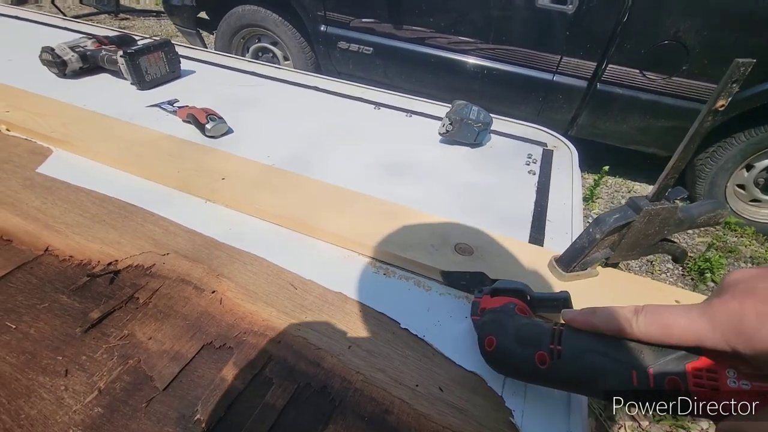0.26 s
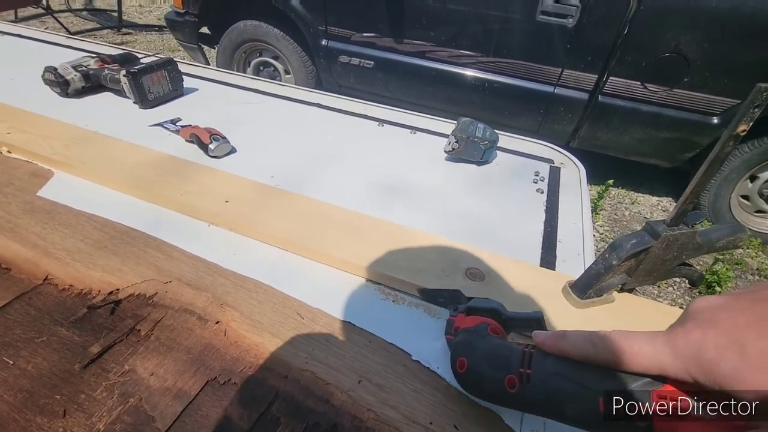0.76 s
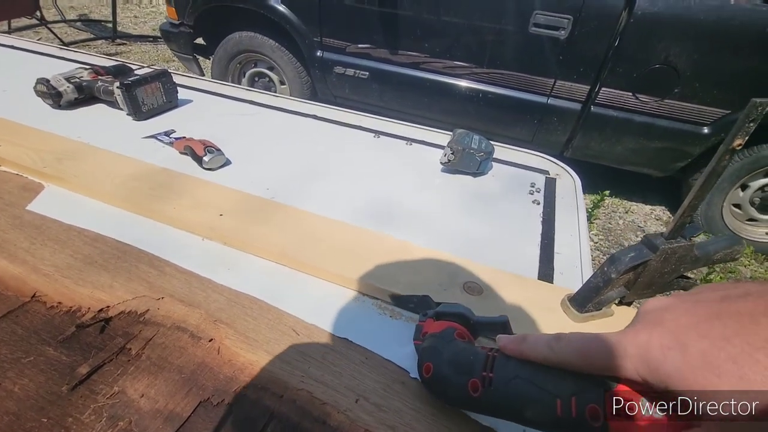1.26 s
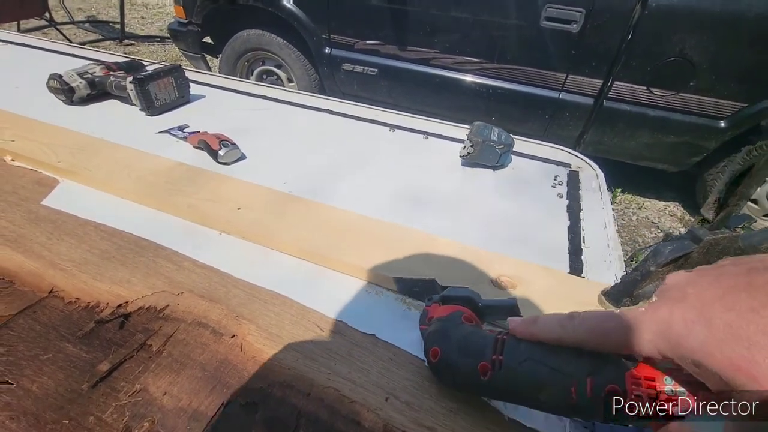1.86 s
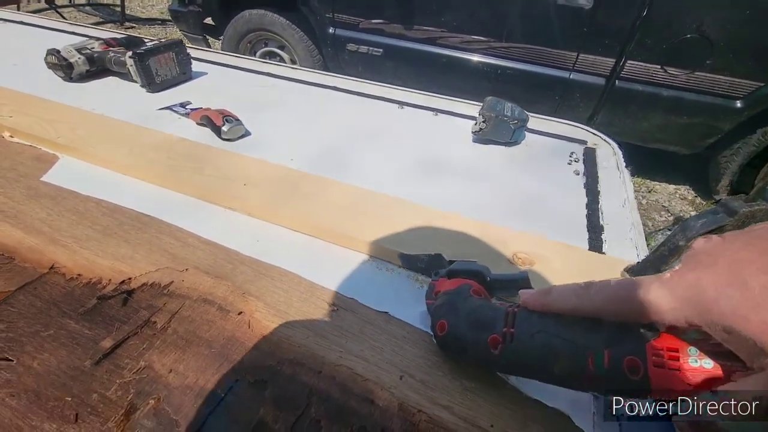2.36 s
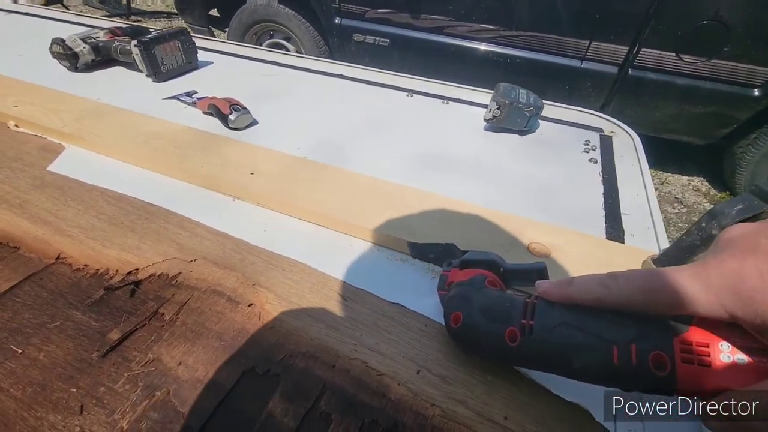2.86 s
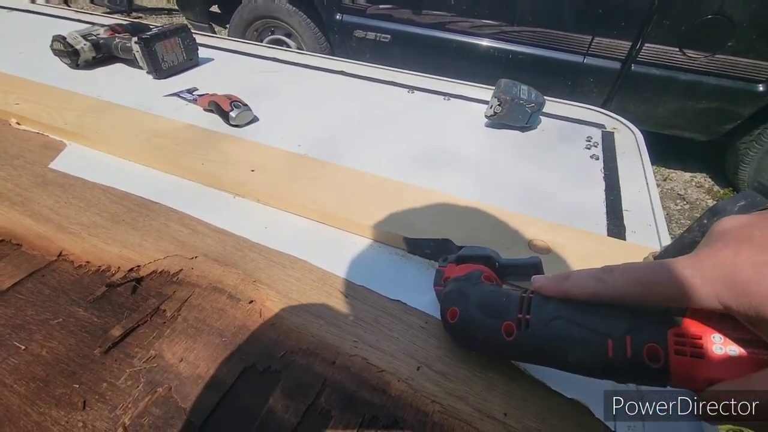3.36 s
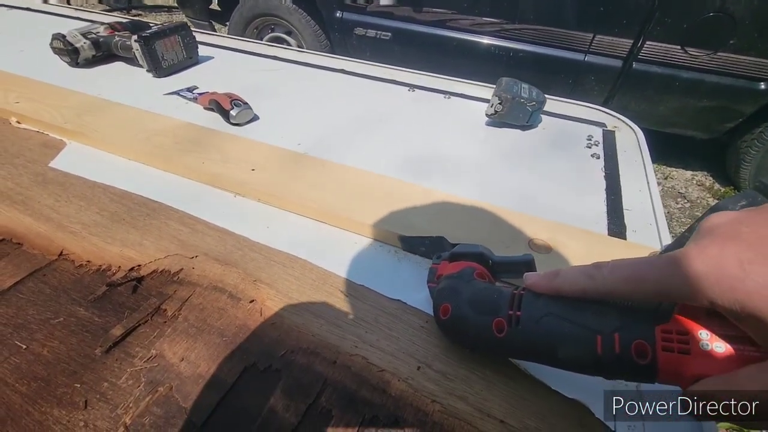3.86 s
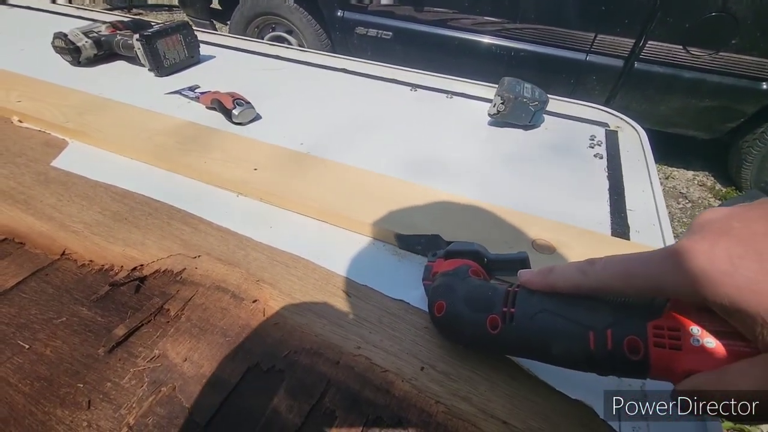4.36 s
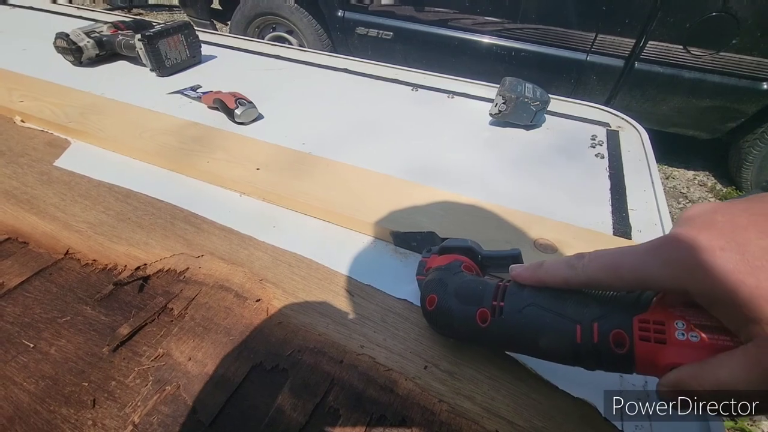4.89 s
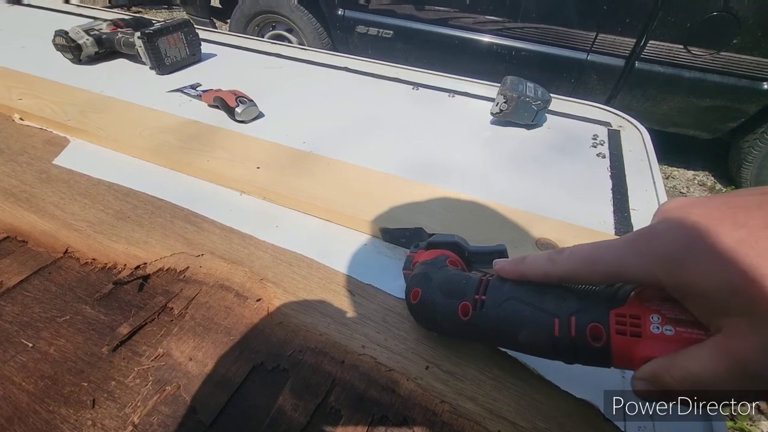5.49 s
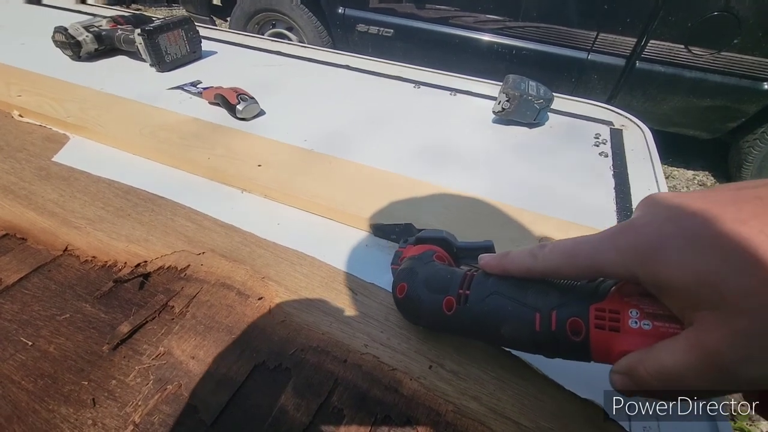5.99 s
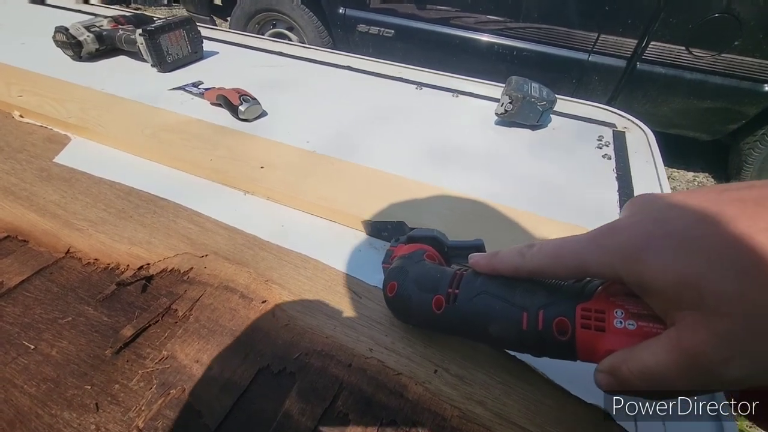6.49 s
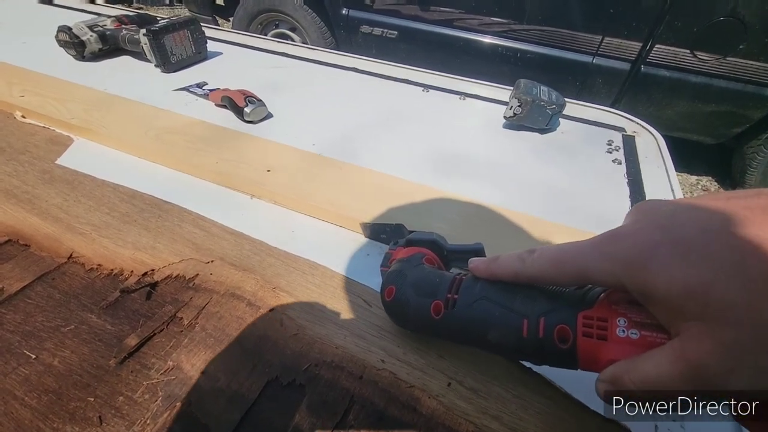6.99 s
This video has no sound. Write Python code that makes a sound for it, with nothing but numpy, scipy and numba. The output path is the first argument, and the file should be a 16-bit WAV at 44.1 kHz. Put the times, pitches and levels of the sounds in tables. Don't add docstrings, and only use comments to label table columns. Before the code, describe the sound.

Outdoors, very close to a stereo microphone, a cordless oscillating saw is already running and never stops. Its dense, nasal buzz holds nearly one low pitch while a bright metallic ring and pulsing tooth fizz come forward as the blade enters the wood within the first second. The tone changes as the grip shifts; dull knocks fall around the middle, over low, uneven wind buffeting.

```python
import sys
import numpy as np
from scipy import signal
from scipy.fft import rfft, irfft, next_fast_len
from scipy.io import wavfile
from scipy.ndimage import uniform_filter1d
from numba import njit

SR = 44100
rng = np.random.default_rng(int(sys.argv[2]) if len(sys.argv) > 2 else 0)


def log_audio(samples):
    frames = np.atleast_2d(samples).T
    limited = np.clip(frames, -1, 1)
    pcm = np.round(limited * 32767).astype(np.int16)
    wavfile.write(sys.argv[1], SR, pcm)


def volts_from_decibels(level):
    exponent = np.asarray(level, float) / 20
    return 10 ** exponent


N = 319284
ORDERS_N, HOP = 63, 64

# time_s, stroke_hz
STROKE_RATE = [(0.0, 239.3), (0.08, 242.6), (1.03, 252.4), (1.81, 251.6), (1.85, 253.2), (2.34, 253.3),
               (2.76, 251.3), (2.86, 251.5), (3.41, 249.2), (3.53, 250.4), (3.69, 251), (4.78, 248.7),
               (4.86, 246.5), (5.75, 243.7), (6.61, 248.3), (7.24, 244)]
# pitch_hz, level_db
STEEL = [(2250, 1.5), (2500, 1.5), (2750, -15.5), (3000, -5.5), (3250, -4.5), (3500, -10.5), (3750, -8.5),
         (4850, -11.5), (5600, -15.5), (7000, -15), (8260, -21), (9120, -18.5), (10300, -22.5),
         (14900, -18.5)]
# order, level_db
FIZZ = [(1, -24), (2, -16), (3, -24.5), (5, -9), (6, -41), (7, -12.5), (9, -9.5), (13, -8.5), (20, -5.5),
        (28, -1.5), (40, 1.5), (52, 20.5), (62, -10)]
# order, level_db
FLUTTER = [(1, -22), (3, -18.5), (6, -13), (9, -11.5), (13, -8), (20, -7.5), (62, -2)]
ALIKE = [(1, 0.01), (3, 0.95), (4, 0.26), (5, 0.94), (6, 0.9), (7, 0.44), (8, 0.55), (9, 0.84), (13, 0.78),
         (20, 0.51), (24, 0.26), (62, 0)]
HOLDS = [-0.002, 2.501, 2.7, 4.8, 4.9, 6.3, 6.5, 7.239]
# order, left_lead_rad, left_minus_right_db
FIRST_GRIP = [(2, -2.78, -3.3), (3, -2.2, -2.9), (4, -2.81, -9.7), (5, -2.2, -2.2), (6, -3.18, 0.1),
              (7, -3.6, 6.5), (8, -2.5, 4.0), (9, -3.67, 0.6), (10, -3.76, 1.7), (11, -4.02, -0.6),
              (12, -7.26, -2.7), (13, -7.49, -0.1), (14, -7.88, 0.8)]
SECOND_GRIP = [(2, -2.53, -8.7), (3, -2.4, -4.2), (4, -2.33, -3.8), (5, -3.12, -0.1), (6, -2.55, 4.8),
               (7, -5.0, 7.5), (8, -2.76, 1.9), (9, -3.78, -2.6), (10, -4.21, -1.1), (11, -6.47, -1.4),
               (12, -6.63, -1.2), (13, -7.9, 4.0), (14, -8.39, 3.8)]
THIRD_GRIP = [(2, -1.68, -10.0), (3, -2.08, -2.7), (4, -2.79, -8.6), (5, -2.63, -3.8), (6, -2.98, -1.0),
              (7, -3.11, 3.1), (8, -1.45, 3.3), (9, -3.21, -2.8), (10, -3.63, -4.7), (11, -6.06, 0.6),
              (12, -6.75, 0.8), (13, -7.4, 3.0), (14, -8.0, 2.0)]
FOURTH_GRIP = [(2, -1.84, -7.8), (3, -0.93, -1.1), (4, -2.41, -6.0), (5, -2.72, -3.4), (6, -2.47, -3.6),
               (7, -0.91, 5.6), (8, -2.3, 3.2), (9, -3.46, -0.5), (10, -4.96, -4.1), (11, -5.94, 2.0),
               (12, -6.83, 1.9), (13, -6.98, 2.8), (14, -8.1, 2.4)]
# order, left_minus_right_db
SHADE = [(15, 4.5), (19, 6.5), (23, -0.5), (33, -3), (60, 2.5)]
BEHIND = [(14, 0), (15, -1), (20, -1.9), (24, -4.6), (63, -25)]
OPPOSED = [5, 6, 8, 15, 16]
# time_s, hum_db, left_minus_right_db, left_lead_rad
LEAN = [(0, -27.5, -6.5, -.6), (1, -29.6, -7, -.9), (2.1, -33, -5.2, -1.05), (2.9, -31, -4.8, -1.2),
        (3.3, -27.4, -1.5, -1.9), (4.5, -26.2, 3.2, -1.35), (5, -22.4, 4.8, -1.1), (5.8, -20.4, 3.5, -.7),
        (6.4, -21.8, 2.3, -.6), (6.9, -20.4, .5, -.45), (7.24, -20.1, -.1, -.4)]
# time_s, steel_ring_db, firmness_of_seat_db
BITE = [(0, -31, 6.5), (.45, -31, -2), (.84, -19, 2.5), (1.1, -24, -1.5), (1.55, -19.5, -4.5),
        (2, -25, 5.5), (2.35, -23, 10), (2.66, -20.5, 9.5), (3.1, -19.5, 1), (3.36, -20.5, 4),
        (3.64, -17.5, -2), (3.8, -18.5, 2), (4.2, -20.5, 4.5), (4.76, -19, -2), (5.3, -16, 3.5),
        (5.9, -19, -5), (6.3, -17, -7), (7.24, -20.5, 1.5)]
# order, first_db, second_db, third_db, fourth_db
PANEL = [(2, -36, -24.3, -31.8, -25.2), (3, -25.5, -27.5, -30.2, -39), (4, -28, -34.3, -36.3, -30.8),
         (5, -29, -25.2, -24.3, -27.8), (6, -28.3, -33.5, -30.3, -34.8), (7, -29.5, -33.5, -28, -31.3),
         (8, -27, -29.7, -31.8, -32.2)]
# order, change_before_entry_db, share_of_seat, second_grip_arrives_s
PANEL_ANSWERS = [(2, 1, 0, 3.35), (3, -1.5, .35, 3.4), (4, -3.5, -.4, 2.8), (5, 1.5, 0, 3.2),
                 (6, 0, 0, 2.75), (7, 3, .45, 3.4), (8, -4, .2, 3.5)]
# order, first_db, second_db, third_db, fourth_db
BLADE = [(9, -27, -32.5, -32, -34.5), (10, -23.5, -24, -28.5, -26.5), (15, -20.5, -20.5, -17.5, -19),
         (33, -22.5, -23, -20, -23)]
# order, change_before_entry_db, share_of_seat, second_grip_arrives_s
BLADE_ANSWERS = [(9, -2.5, 0.93, 3.3), (10, -4, 0.43, 3.2), (15, 1.5, 0.15, 2.6), (33, -2.5, .01, 2.8)]
# order, first_db, second_db, third_db, fourth_db
TINT = [(10.1, -0.5, -0.5, 5.5, -1), (11, 13, 1.5, -0.5, 7), (11.9, 0, 2.5, -2.5, -2),
        (13, 3, 3.3, 0.6, 1.4), (14, 0, 3.5, 3.5, 1.5), (14.6, -1, -2, -5, -2.5), (18.4, 2.5, -1, 0, 2),
        (20.1, 5, 5, 4, 2), (23.8, 2, 1, -2.5, 0), (33, 2, 2, 1, -0.5), (35, 6, 1.5, 1, 1.5),
        (38.6, 2, 1.5, 0, -1)]
# start_s, peak_db, pitch_hz, decay_to_60_db_down_s
KNOCKS = [
    (3.417, -19, 228, 0.059),
    (3.78, -29, 200.5, 0.063),
    (3.9, -36, 149.8, 0.072),
    (4.797, -39, 457, .06),
    (4.809, -15, 246, 0.068),
    (5.23, -37, 215.5, 0.072),
    (6.448, -24, 198.4, 0.062),
]
# peak_s, peak_db, rise_s, fall_s
GUSTS = [
    (.5, -30.5, 0.36, 0.28),
    (1.85, -45, 0.76, 0.9),
    (2.4, -45, 0.15, 0.35),
    (2.95, -39.5, 0.2, .9),
    (3.8, -34.5, 0.17, 0.4),
    (5.25, -30, 0.67, 0.28),
    (5.6, -32, 0.21, 0.38),
    (6.3, -39.5, 0.43, 1.5),
    (7.1, -42, 0.47, .5),
]
# pitch_hz, level_db_per_hz
RUMBLE = [(15, -41), (25, -2), (70, 7), (94, 4), (156, -7.5), (190, -3.5), (250, -23), (420, -120)]


def tool():
    order = np.arange(1, ORDERS_N + 1)
    t = np.arange(N // HOP + 2) * HOP / SR
    now = np.arange(N) / SR
    jitter_rad = 0.024 * np.interp(now, t, drift((len(t),), hz=30).real)
    turn = np.exp(2j * np.pi * np.cumsum(curves(STROKE_RATE, now)[0]) / SR + 1j * jitter_rad)
    line_db, at_ports = levels(order, t), ports(order, t)
    patches = uniform_filter1d(drift(line_db.shape, hz=1.4).real, size=3, axis=0)
    line_db[14:] += 4 * patches[14:]

    def play(gain, path):
        by_knot = (gain * path).transpose(0, 2, 1)
        return np.sqrt(2) * stack(turn, np.ascontiguousarray(by_knot), HOP)

    chatter_db = chatter(t) * np.clip(order / 9, 0, 1)[:, None]
    fizz = volts_from_decibels(along(FIZZ, order)[:, None] + chatter_db)
    lines = play(volts_from_decibels(line_db) * fluttering(order, t, fizz), at_ports)

    fizz_db = 0.5 * line_db + 0.5 * line_db.mean(axis=1, keepdims=True)
    dust = fizz / np.sqrt(1 + fizz ** 2) * heard(order, len(t), hz=177, order_of_fall=8)
    opposite = np.reshape([-1j, 1j], (2, 1, 1))
    from_cut = np.where(np.isin(order, OPPOSED)[:, None], opposite, at_ports)
    hiss = play(volts_from_decibels(fizz_db + 2.0) * dust, from_cut)

    gate = 0.28 * turn.real + 0.33 * (turn ** 2).real
    pulsed_hz = 2300
    pulses = irfft(rfft(gate * hiss) * (np.fft.rfftfreq(N, 1 / SR) > pulsed_hz), N)
    return lines + hiss + pulses


def fluttering(order, t, fizz):
    flutter = volts_from_decibels(along(FLUTTER, order))[:, None]
    sway = 1.1 * heard(order, len(t), hz=11) + 1.4 * heard(order, len(t), hz=32)
    start_rad = rng.uniform(0, 2 * np.pi, (ORDERS_N, 1))
    wander_rad = 0.81 * drift((ORDERS_N, len(t)), hz=2.34).real
    shape = np.exp(1j * (start_rad + wander_rad))
    return shape * (1 + flutter * sway) / np.sqrt((1 + flutter ** 2) * (1 + fizz ** 2))


def levels(order, t):
    ring_db, seat_db = curves(BITE, t)
    outside = np.interp(t, (0.55, 0.9), [1, 0])
    settle_s = 0.41
    parts = []
    for row, answer in zip(PANEL + BLADE, PANEL_ANSWERS + BLADE_ANSWERS):
        _, early_db, share, s = answer
        grip_db = held(row[1:], [0, s - settle_s, s, *HOLDS[3:]], t)
        parts.append(grip_db + early_db * outside + share * seat_db)
    parts = np.array(parts)
    tremor = drift((2, len(t)), hz=4.7).real
    ring_db = ring_db + 1.07 * tremor[0]
    teeth_and_tips_db = parts[9:] + 0.95 * tremor[1]
    blade_db = np.array([*parts[7:9], ring_db, *teeth_and_tips_db])
    band = np.searchsorted([10, 11, 15, 33], order[8:], side="right")
    steel_db = along(STEEL, 249 * order[8:])[:, None]
    hum_db = curves(LEAN, t)[:1]
    return np.vstack([hum_db, parts[:7], blade_db[band] + tint(order[8:], t) + steel_db])


def tint(order, t):
    return np.array([held(row, HOLDS, t) for row in curves(TINT, order).T])


def chatter(t):
    rattle_db = held((-1.4, -2, 1.1, 0), HOLDS, t)
    firm_db, quieted = 3.5, 1.07
    return rattle_db - quieted * np.clip(curves(BITE, t)[1] - firm_db, 0, None)


def ports(order, t):
    grips = np.repeat(np.array([FIRST_GRIP, SECOND_GRIP, THIRD_GRIP, FOURTH_GRIP]), 2, axis=0)
    lead, pan_db = (np.array([np.interp(t, HOLDS, row) for row in grips[:, :, c].T]) for c in (1, 2))
    high = order[14:, None]
    lean = curves(LEAN, t)
    lead = np.vstack([lean[2:], lead, lead[-1] + curves(BEHIND, high)[0]])
    pan_db = np.vstack([lean[1:2], pan_db, along(SHADE, high) + 0 * t])
    loose = np.sqrt(1 - np.clip(along(ALIKE, order), 0, 1))[:, None]
    loose = loose * np.clip((order - 1) / 11, 0, 1)[:, None] ** 2
    lead = lead + 1.5 * loose * drift(lead.shape, hz=1.49).real
    half = volts_from_decibels(pan_db / 2) * np.exp(0.5j * lead)
    return np.array([half, 1 / half]) * np.sqrt(2 / (volts_from_decibels(pan_db) + volts_from_decibels(-pan_db)))


def heard(order, size, hz, order_of_fall=4):
    alike = np.clip(along(ALIKE, order), 0, 1)[:, None]
    shared = drift((ORDERS_N, size), hz, order_of_fall)
    separate = drift((2, ORDERS_N, size), hz, order_of_fall)
    return np.sqrt(alike) * shared + np.sqrt(1 - alike) * separate


@njit
def stack(turn, gains, hop):
    out = np.zeros((gains.shape[0], len(turn)))
    for i in range(len(turn)):
        j, u, z = i // hop, (i % hop) / hop, turn[i]
        for k in range(gains.shape[2]):
            for c in range(gains.shape[0]):
                out[c, i] += (z * (gains[c, j, k] * (1 - u) + gains[c, j + 1, k] * u)).real
            z *= turn[i]
    return out


def knocks():
    out, t = np.zeros(N + SR), np.arange(SR // 4) / SR
    for s, db, hz, t60 in KNOCKS:
        bump = volts_from_decibels(db - 60 * t / t60) * np.sin(2 * np.pi * hz * t) * (1 - np.exp(-t / 0.0014))
        out[round(s * SR):][:len(t)] += bump
    return out[:N] * volts_from_decibels(np.array([[1.5], [-1.5]]))


def wind():
    m = next_fast_len(N)
    colour = volts_from_decibels(along(RUMBLE, np.fft.rfftfreq(m, 1 / SR)))
    rush = irfft(rfft(rng.standard_normal((2, m))) * colour, m)[:, :N]
    lumps = drift((2, N // HOP + 2), hz=19.0).real
    rush *= volts_from_decibels(5.0 * np.repeat(lumps, HOP, axis=1)[:, :N])
    return volts_from_decibels(gusts(np.arange(N) / SR) + 3.5) * rush / rush.std()


def gusts(t):
    calm_db, fade_db = -50.5, 17
    power = volts_from_decibels(calm_db) ** 2
    for s, db, rise, fall in GUSTS:
        away = np.where(t < s, (s - t) / rise, (t - s) / fall)
        power = power + volts_from_decibels(db - fade_db * away) ** 2
    return 10 * np.log10(power)


def along(points, x):
    at, v = np.transpose(points)
    return np.interp(np.log(x + 1), np.log(at + 1), v)


def curves(rows, t):
    s, *cols = np.transpose(rows)
    return np.array([np.interp(t, s, c) for c in cols])


def held(per_grip, moments, t):
    return np.interp(t, moments, np.repeat(per_grip, 2))


def drift(shape, hz, order=4):
    z = rng.standard_normal(shape) + 1j * rng.standard_normal(shape)
    f = np.fft.fftfreq(shape[-1], HOP / SR)
    z = np.fft.ifft(np.fft.fft(z) / np.sqrt(1 + (f / hz) ** order))
    return z / np.sqrt(np.mean(abs(z) ** 2))


def scene():
    return tool() + knocks() + wind()


def top_cut(x):
    return signal.sosfilt(signal.butter(12, 16670, fs=SR, output="sos"), x)


def record(dry):
    x = dry / (1 + abs(dry / 1.08) ** 6) ** (1 / 6)
    x = irfft(rfft(x) * (np.fft.rfftfreq(N, 1 / SR) < 15700), N)
    return top_cut(x)


dry = scene()
out = record(dry)
log_audio(out)
```